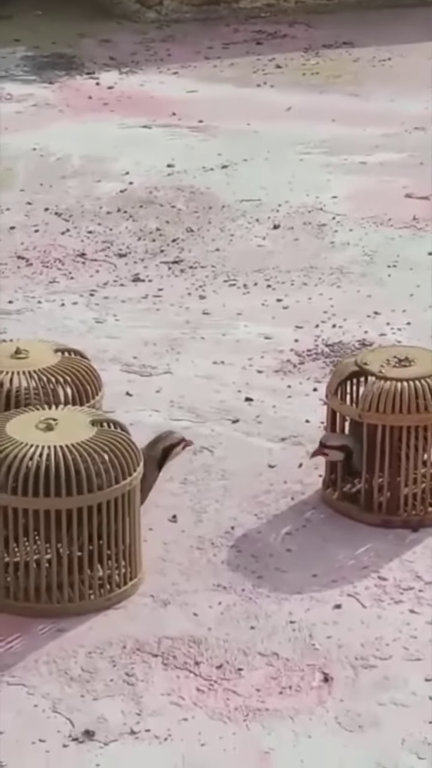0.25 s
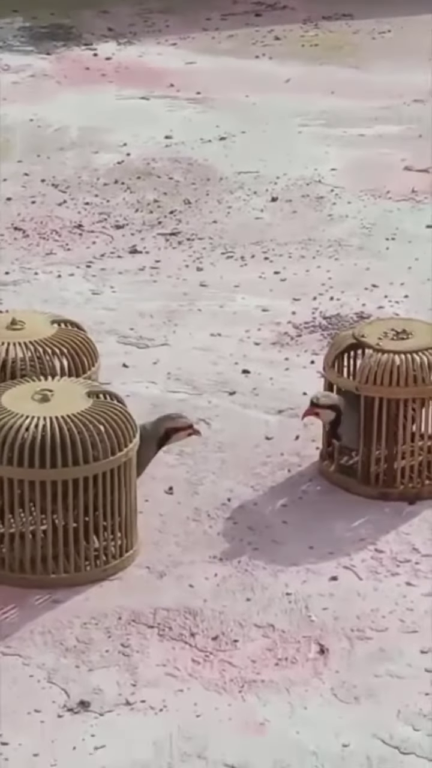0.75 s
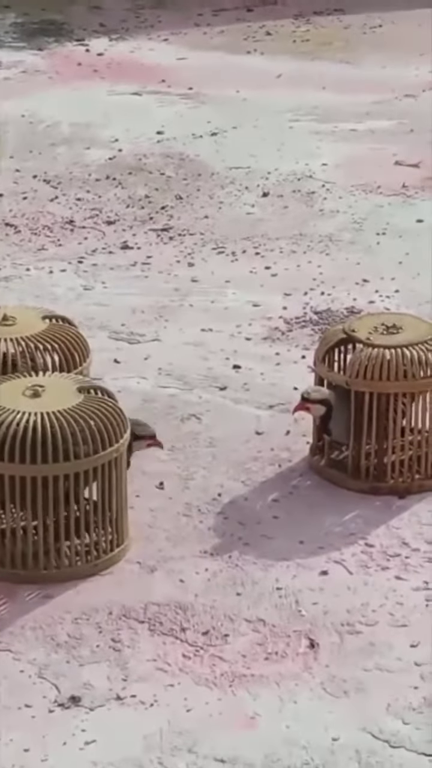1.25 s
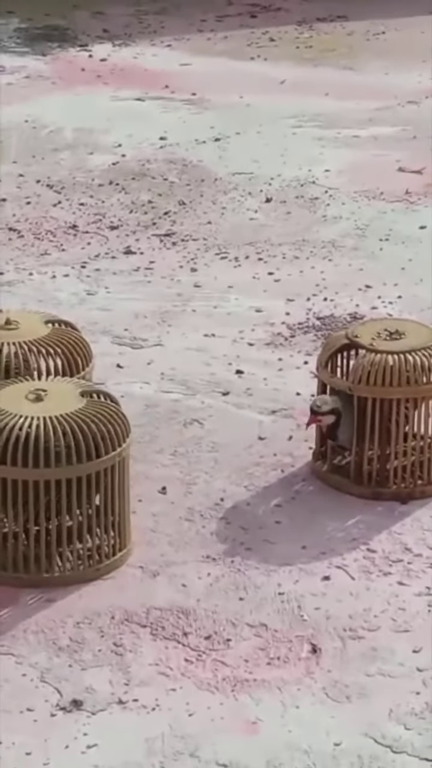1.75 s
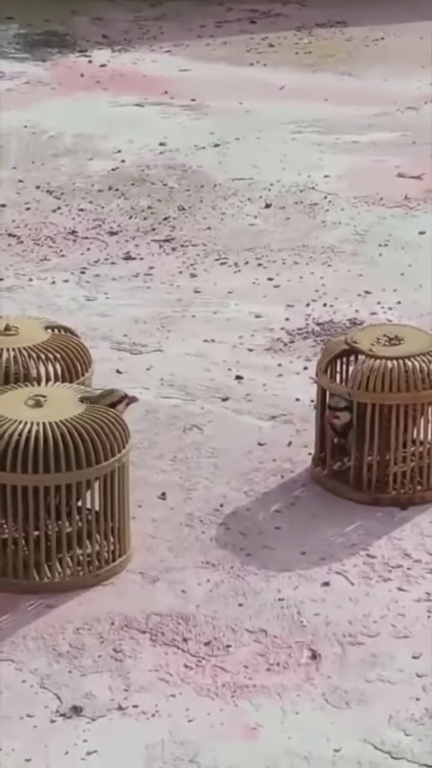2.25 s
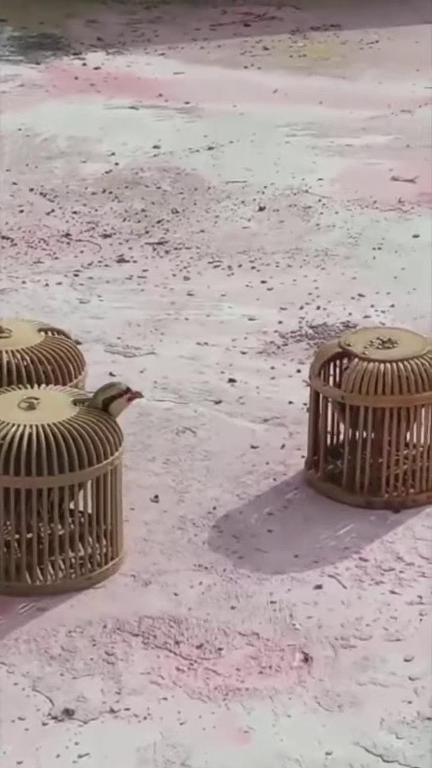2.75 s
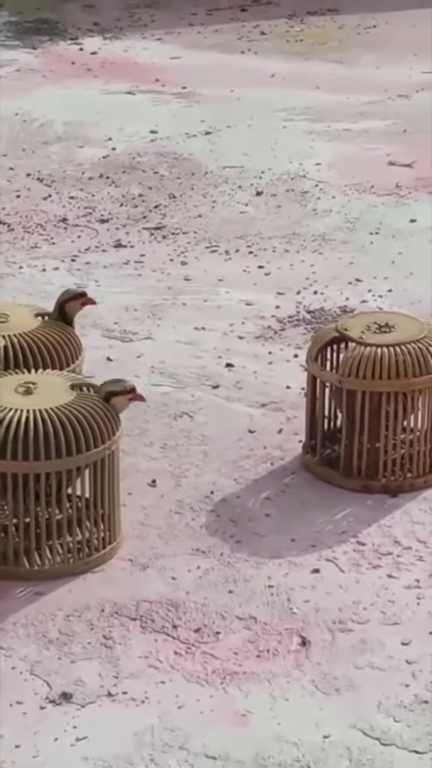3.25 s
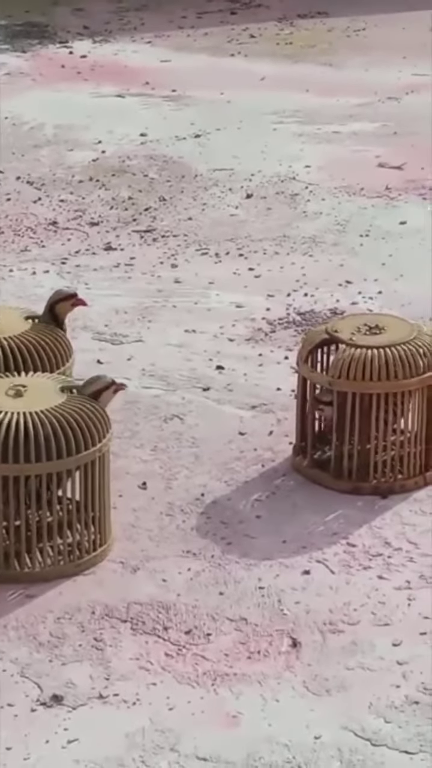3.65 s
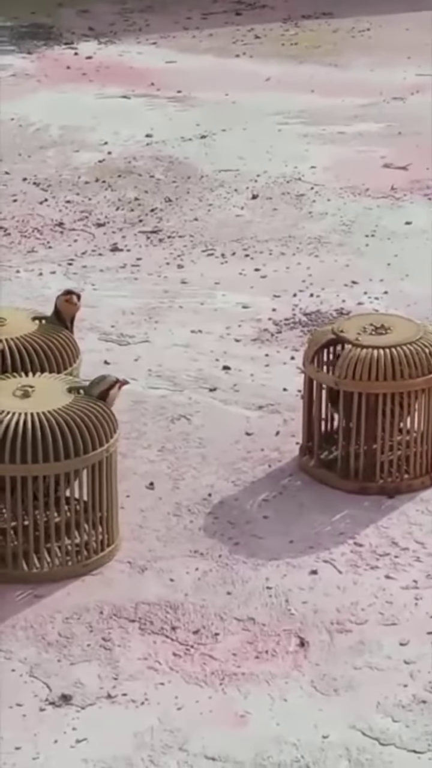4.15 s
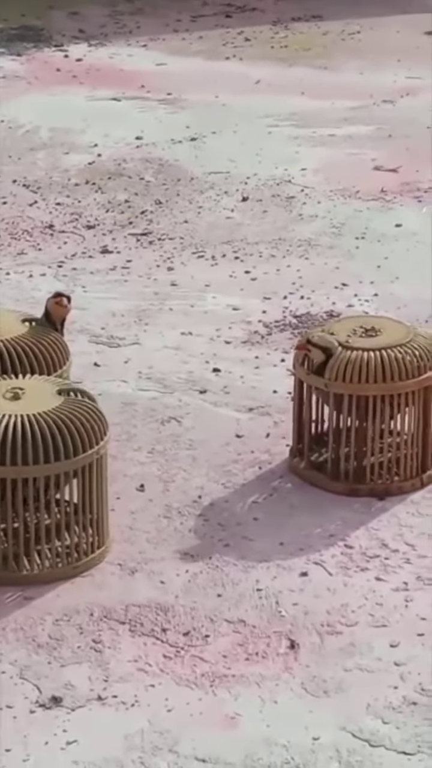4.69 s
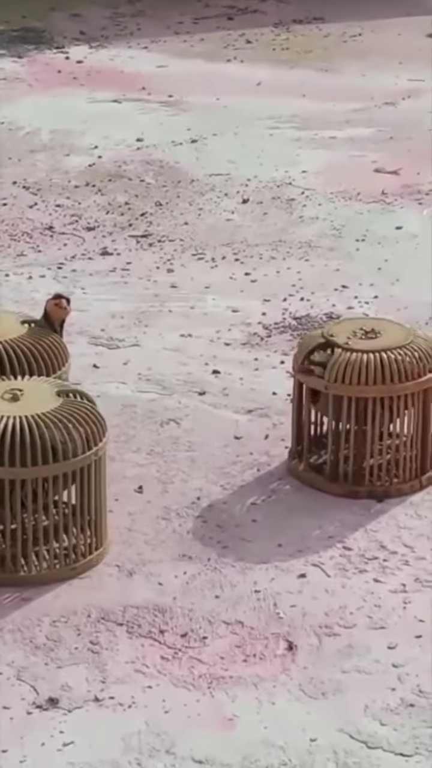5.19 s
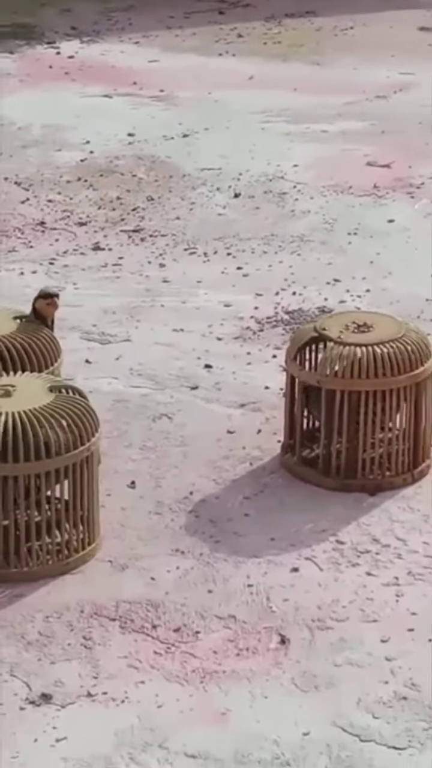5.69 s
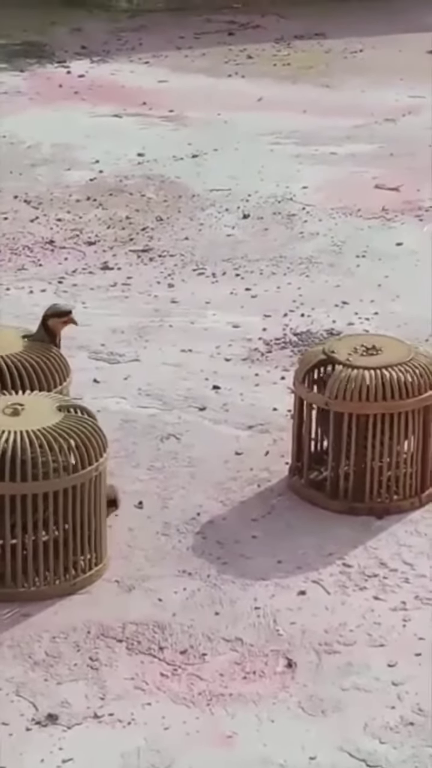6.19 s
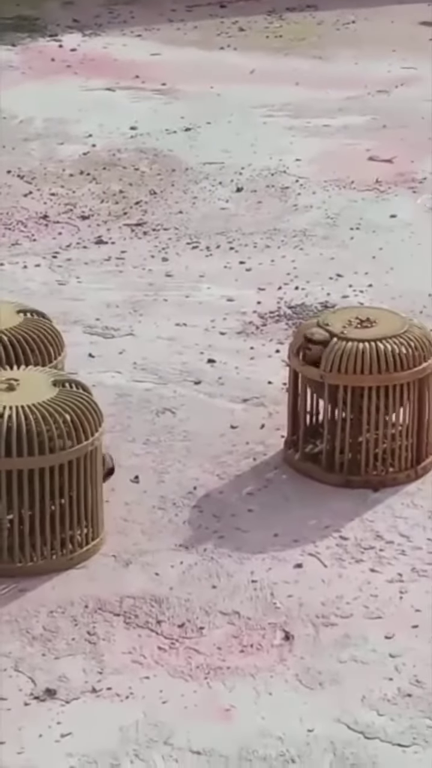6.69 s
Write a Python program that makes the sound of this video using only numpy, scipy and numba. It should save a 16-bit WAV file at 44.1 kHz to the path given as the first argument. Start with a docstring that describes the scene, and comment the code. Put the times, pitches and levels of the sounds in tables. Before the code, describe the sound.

Rasping partridge clucks and squeaky squawks alternate outdoors, echoing briefly off walls, before fading to quieter clucks with light wind bumps.

```python
"""A concrete yard with a wall behind it, where caged partridges call to each other.
Harsh falling clucks alternate with sharper squawks, then thin out into softer answers, with low coos between.
Soft clear tones are faint short notes, and call tails ringing on in the yard.
Each voice is a rough pulse train from the syrinx through throat and beak resonances, with gliding clear tones.
A thin, wavering tone whistles far off; shaped noise makes the background, rumble, rustles and light wind,
and short decaying sines are the wind bumping the microphone."""
import sys
import numpy as np
from scipy import signal
from scipy.fft import rfft, irfft, next_fast_len
from scipy.io import wavfile
from scipy.ndimage import uniform_filter1d
from numba import njit

SR = 44100
rng = np.random.default_rng(int(sys.argv[2]) if len(sys.argv) > 2 else 0)


def materialize(psi):
    """Save the field psi as 16-bit PCM at rate SR to the path in sys.argv[1].

    A 1-D psi becomes a single channel; in a 2-D psi each row is a channel.
    """
    bounded = np.clip(np.atleast_2d(psi).T, -1, 1)
    quanta = np.round(bounded * 32767).astype(np.int16)
    wavfile.write(sys.argv[1], SR, quanta)


N = 305613
TIME = np.arange(N) / SR


def from_db(db):
    """Decibels to gain."""
    return 10 ** (np.asarray(db) / 20)


def rms_one(x):
    """Scale to unit power."""
    return x / np.sqrt(np.mean(x ** 2) + 1e-20)


def in_time(rows):
    """Each column of a curve at every sample."""
    seconds, *columns = np.transpose(rows)
    return [np.interp(TIME, seconds, column) for column in columns]


def at_hz(points, hz):
    """Read a spectrum on a log-frequency axis."""
    f, value = np.transpose(points)
    return np.interp(np.log(hz + 1), np.log(f), value)


def add(out, start_s, sound):
    """Mix a sound in at a time."""
    i = max(0, int(start_s * SR))
    out[..., i:i + sound.shape[-1]] += sound[..., :max(0, N - i)]


def wobble(size, rate_hz):
    """Random wander that takes a new value at the given rate."""
    at = np.arange(size) * rate_hz / SR
    return np.interp(at, np.arange(size), rng.standard_normal(size))


# Left-right likeness of diffuse sound. Each row: frequency in Hz, likeness from 0 to 1.
LIKENESS = [(60, 0.48), (160, 1), (300, 1), (900, 0.9), (1400, 0.85), (2300, 0), (4000, 0), (8000, 0.34)]


def diffuse(spectrum, size):
    """Stereo noise from all around: its two sides are more or less alike at each frequency."""
    hz = np.fft.rfftfreq(size, 1 / SR)
    alike = np.clip(at_hz(LIKENESS, hz), -1, 1)
    mid, side = rfft(rng.standard_normal((2, size)))
    pair = np.sqrt(1 + alike) * mid + np.sqrt(1 - alike) * side * [[1], [-1]]
    return rms_one(irfft(pair * from_db(at_hz(spectrum, hz)), size))


@njit
def resonate(x, hz, width):
    """A moving resonance with about unit gain at its peak."""
    y, r = np.zeros(len(x)), np.exp(-np.pi * width / SR)
    for i in range(2, len(x)):
        driven = (1 - r * r) / 2 * (x[i] - x[i - 2])
        y[i] = driven + 2 * r * np.cos(2 * np.pi * hz[i] / SR) * y[i - 1] - r * r * y[i - 2]
    return y


def resonate_twice(x, hz, width):
    """The same resonance twice in a row, for steeper sides."""
    return resonate(resonate(x, hz, float(width)), hz, float(width))


def syrinx(pitch, jitter, rasp, uneven_db=2.5):
    """Uneven pulses of the membranes, lapsing into strong and weak pairs, each with a puff of turbulence."""
    size = len(pitch)
    phase = 2 * np.pi * np.cumsum(pitch * (1 + jitter * wobble(size, 260.6))) / SR
    harmonic = np.arange(1, 20)[:, None]
    pulses = rms_one(np.cos(harmonic * phase + .16 * harmonic ** 2).sum(0))
    puffs = rms_one(rng.standard_normal(size) * (1 + np.cos(phase)))
    pairs = 1 + .45 * wobble(size, 60) * np.cos(phase / 2)
    return (pulses + rasp * puffs) * pairs * from_db(uneven_db * wobble(size, 298.8))


def rattle(size, depth, rate_hz=125, scatter=.25):
    """Slow, uneven flapping of the syrinx: a gain that breaks the note into grains, and a ramp up each grain."""
    rate = rate_hz * (1 + scatter * wobble(size, rate_hz))
    turn = (rng.random() + np.cumsum(rate) / SR) % 1
    return rms_one(1 - depth * np.cos(2 * np.pi * turn)), turn - .5


def throat(source, beak_hz, beak, chest, chest_db, treble, treble_db):
    """Steep resonances in parallel: the middle ones follow the beak and are evened in level, the rest stay."""
    def bank(modes, scale):
        out = np.zeros(len(source))
        for k, (f, width, db) in enumerate(modes):
            out += (-1) ** k * from_db(db) * resonate_twice(source, f * scale, width)
        return out
    still = np.ones(len(source))
    core = bank(beak, beak_hz)
    power = uniform_filter1d(core ** 2, size=700) + np.var(core) / 10
    fixed = from_db(chest_db) * bank(chest, still) + from_db(treble_db) * bank(treble, still)
    return core / np.sqrt(power) + fixed / np.std(core)


def push(t, length, swell, release, start_db=-16, onset=.004):
    """Air pressure of one note: a quick onset (s), a swell, a hold and a collapse."""
    rise = np.minimum(t / onset, 1) * from_db(start_db * np.maximum(1 - t / swell, 0))
    return rise * np.exp(-np.maximum(t - length, 0) / release)


def glide(length, hz, rise, waver, flutter, octave_db):
    """A short clear tone that swells and fades while it slides through its pitch."""
    u = np.linspace(0, 1, int(length * SR))
    pitch = hz * (1 + rise * (u - .5)) * (1 + waver * wobble(len(u), 294))
    phase = 2 * np.pi * np.cumsum(pitch) / SR
    swell = np.sin(np.pi * u) * (1 + flutter * wobble(len(u), 270))
    return swell * (np.sin(phase) + from_db(octave_db) * np.sin(2 * phase))


def placed(note, pan_db, bounce_db=-9, bounce_s=0.00219):
    """A note on two sides with one short reflection, its delay drawn at random for each note and side."""
    at = np.arange(len(note))
    lags = rng.uniform(.2, 1, 2) * bounce_s * SR
    bounce = np.array([np.interp(at - lag, at, note, left=0) for lag in lags])
    both = note + from_db(bounce_db) * bounce
    return both * from_db([[pan_db], [0]]) / np.sqrt(1 + from_db(bounce_db) ** 2)


# Level of the outdoor background. Each row: time in seconds, level in dB.
BACKGROUND = [(0, -63.5), (.5, -56.5), (1.5, -54.5), (3.5, -52.5), (4.6, -59.5), (5.2, -60.5), (5.9, -57),
              (6.93, -59)]
# Its colour. Each row: frequency in Hz, relative density in dB.
YARD = [(45, -5.5), (200, -15.5), (320, -3), (430, -6), (700, -5), (1300, 0), (2100, -4.5), (3000, -14),
        (4500, -18.5), (6000, -20.5), (7500, -47.5)]


def outdoor_background():
    """Diffuse noise with a fixed colour and a slowly moving level."""
    level_db, = in_time(BACKGROUND)
    return diffuse(YARD, N) * from_db(level_db)


# Level of the low, distant rumble. Each row: time in seconds, level in dB.
RUMBLE = [(0, -67), (.3, -66), (.45, -56.5), (2, -58.5), (3.6, -60.5), (6.93, -67)]
# Its colour. Each row: frequency in Hz, relative density in dB.
RUMBLE_COLOUR = [(40, -21), (85, 0.5), (155, 1), (230, -11.5), (400, -36)]


def rumble():
    """Low diffuse noise that comes up early and slowly fades."""
    level_db, = in_time(RUMBLE)
    return diffuse(RUMBLE_COLOUR, N) * from_db(level_db)


# Strength of the breeze. Each row: time in seconds, level in dB before lumps and side trims.
BREEZE = [(0, -83), (.6, -72), (3.9, -66), (4.3, -56.5), (4.6, -60), (4.85, -53), (5.4, -54.5),
          (5.7, -56.5), (6.3, -61), (6.6, -74.5)]
# Colour of the wind. Each row: frequency in Hz, relative density in dB.
WIND = [(12, -56.5), (20, -26.5), (44, -0.5), (81, 1), (128, -7), (216, -21), (300, -21), (390, -60.5),
        (660, -120)]
# Wind bumps. Each row: start in seconds, relative level in dB, left pitch in Hz, left over right in dB.
BUMPS = [(2.886, -50, 74, 20.5), (2.924, -44.5, 98, 21), (4.107, -49.5, 80, 16), (4.363, -47, 72, 16),
         (4.781, -45.5, 77.4, 13), (5.348, -42.5, 101, 27), (5.377, -37.5, 109, 18.5),
         (5.393, -35, 126, 18), (5.465, -39.5, 91, 17), (5.915, -38, 176, -21.5), (6.109, -49, 79.6, 18)]


def wind(lumps_db=-4.0, left_db=6, right_db=-2, eddy_db=6):
    """Lumpy rumble on the ports, and single eddies that thump for a cycle or two, unlike on each side."""
    wind_db, = in_time(BREEZE)
    lumps = from_db(wind_db + lumps_db * wobble(N, 24))
    out = diffuse(WIND, N) * lumps * from_db([[left_db], [right_db]])
    t = np.arange(SR // 10) / SR
    for s, db, hz, pan_db in BUMPS:
        eddy = np.sin(2 * np.pi * hz * t * [[1], [.85]]) * from_db([[pan_db / 2], [-pan_db / 2]])
        envelope = np.minimum(t / 0.0029, 1) * np.exp(-t * hz / 0.82)
        add(out, s, from_db(db + eddy_db) * eddy * envelope)
    return out


# Soft rustles. Each row: middle in seconds, half length in seconds, level in dB before the grain.
RUSTLES = [(5.685, 0.076, -59.5), (6.006, 0.16, -56), (6.287, 0.11, -60.5)]
# Their colour. Each row: frequency in Hz, relative density in dB.
RUSTLE_COLOUR = [(300, -35), (1500, 6.5), (3500, 0.5), (5500, -5), (7000, -9.5)]


def rustles(grain_db=2.5):
    """Soft, grainy swishes: coloured noise under bell-shaped swells."""
    swell = sum(from_db(db) * np.exp(-((TIME - s) / half) ** 2) for s, half, db in RUSTLES)
    return diffuse(RUSTLE_COLOUR, N) * swell * from_db(grain_db * wobble(N, 90))


# Far whistle. Each row: time in seconds, pitch in Hz before waver, relative level in dB,
# octave in dB against the fundamental.
WHISTLE = [(4.98, 2300, -76, -20), (5.08, 2330, -59, -22), (5.27, 2346, -64, -18), (5.37, 2620, -55.5, -6),
           (5.47, 2543, -55, -12), (5.56, 2503, -57, -3), (5.66, 2485, -57, -11.5), (5.78, 2525, -58, -13),
           (5.86, 2480, -64, -22), (5.96, 2383, -54, -23), (6.15, 2420, -80, -20)]


def whistle(waver=.024):
    """A nearly pure, wavering note whose octave comes and goes and whose level flutters."""
    hz, db, octave_db = in_time(WHISTLE)
    phase = 2 * np.pi * np.cumsum(hz * (1 + waver * wobble(N, 1100))) / SR
    sounding = (TIME > WHISTLE[0][0]) & (TIME < WHISTLE[-1][0])
    note = np.sin(phase) + from_db(octave_db) * np.sin(2 * phase)
    return sounding * from_db(db) * note * from_db(4 * wobble(N, 45) - 4)


# Soft clear tones: faint short notes, and call tails ringing on in the yard.
# Each row: start in seconds, length in seconds, middle pitch in Hz, slide as a share, level in dB.
CLEAR_TONES = [(.245, 0.061, 1238, -.033, -48), (.982, 0.027, 1235, .076, -42),
               (1.785, 0.059, 1506, 0, -45), (2.43, .04, 1190, 0, -43.5), (3.484, 0.052, 1299, -.062, -37),
               (5.402, .028, 1305, -.064, -45), (5.645, 0.06, 1184, .054, -49.5),
               (5.86, 0.047, 1225, .34, -47), (6.148, 0.019, 1157, .28, -44),
               (6.481, .03, 814, .085, -54.5)]


def clear_tones(waver=.045):
    """Soft sliding tones with a faint octave, blurred by fast random wander of pitch and level."""
    out = np.zeros(N)
    for s, length, hz, rise, db in CLEAR_TONES:
        add(out, s, from_db(db) * glide(length, hz, rise, waver, flutter=.45, octave_db=-19))
    return out


# Low coos. Each row: start in seconds, length in seconds, relative level in dB, throat resonance in Hz,
# slide as a share, clear partial in dB, beak resonance in Hz, its level in dB, treble in dB.
COOS = [(0.559, .045, -45, 850, -.2, -9, 2220, -4.5, -12),
        (0.674, .05, -46.5, 880, 0.17, -13, 2160, -4, -10),
        (1.059, 0.045, -45.5, 856, -0.0051, 13, 2180, -4.5, -11),
        (1.561, 0.043, -48, 777, 0.0058, 5.5, 2170, -9.5, -11.5),
        (1.68, .04, -44.5, 852, -0.12, -10.5, 2060, -4, -8),
        (2.128, 0.036, -47, 776, -.07, 3.5, 2070, 6, -8.5),
        (2.235, 0.05, -50.5, 849, .16, 2.5, 2190, -4.5, -6),
        (2.557, 0.067, -48.5, 949, -0.12, -3, 2160, -0.5, -13.5),
        (3.613, .035, -50, 834, -0.081, -9, 1880, 2, -13),
        (3.678, 0.056, -52, 738, .15, -10, 2070, 6.5, 4.5)]


def coos(throat_width_hz=350, beak_width_hz=450, treble_hz=4300, treble_width_hz=2200, hum_db=-9,
         release=0.018, swell=0.01, linger=1.25):
    """Low notes with the beak nearly shut: one partial glides in the throat resonance under a thin rasp."""
    out, t = np.zeros((2, N)), np.arange(SR // 7) / SR
    for s, length, db, throat_hz, slide, clear_db, beak_hz, beak_db, treble_db in COOS:
        bend = 1 + slide * (np.minimum(t / length, 1.4) - .5)
        source = syrinx(throat_hz / 2 * bend, jitter=.11, rasp=.7)
        modes = [(throat_hz, throat_width_hz, 0), (throat_hz * 0.68, throat_width_hz, hum_db),
                 (beak_hz, beak_width_hz, beak_db), (treble_hz, treble_width_hz, treble_db)]
        voice = np.zeros(len(t))
        for hz, width, mode_db in modes:
            voice += from_db(mode_db) * rms_one(resonate_twice(source, hz * bend, width))
        add(out, s, placed(voice * push(t, length, swell, release) * from_db(db), pan_db=-0.5))
        clear = glide(length * linger, throat_hz, slide, waver=.022, flutter=.3, octave_db=-20)
        add(out, s, placed(clear * from_db(db + clear_db), pan_db=0.5))
    return out


# Beak resonances of clucks and answers. Each row: multiple of the beak resonance, width in Hz, level in dB.
CLUCK_BEAK = [(0.815, 372, 3), (1.022, 349, 1.5), (1.298, 513, 1.5)]
# Fixed windpipe resonances of clucks and answers, low then high. Each row: Hz, width in Hz, relative level in dB.
CLUCK_CHEST = [(410, 280, -18), (800, 400, -11)]
CLUCK_TREBLE = [(3437, 1200, -19.5), (4460, 160, -24), (5560, 760, -24.5)]
# Soft answers. Each row: start in seconds, length in seconds, relative level in dB,
# middle beak resonance in Hz, treble in dB, clear partial in dB against the note.
ANSWERS = [(3.371, 0.017, -43.5, 1758, 10.5, -1), (3.495, 0.038, -42, 1750, 16, -1),
           (3.606, 0.031, -39, 1665, 1, 5.5), (3.979, 0.034, -46.5, 1664, 10, 11.5),
           (4.258, .089, -45.5, 1560, 7, -0.5), (4.439, 0.066, -44, 1543, 1, 2),
           (4.497, .039, -42.5, 1510, 10, -3), (4.694, .053, -46.5, 1592, 0, 5.5),
           (4.969, .033, -51, 1420, -18, 3.5), (5.152, .058, -46, 1586, -23, -1.5),
           (5.343, .055, -47, 1610, -2, 7), (5.577, .048, -47.5, 1615, -19, 4.5),
           (5.644, .04, -49, 1615, 9, -2.5), (5.76, .045, -47, 1584, -4, 7), (6.07, .075, -45, 1773, 6, 0),
           (6.253, .05, -45.5, 1630, -14, 7), (6.55, .038, -44.5, 1565, -20, 0.5),
           (6.727, .043, -45, 1528, 6.5, 5.5), (6.843, .039, -48, 1586, -11, -1.5)]


def answers(pitch_hz=400, pitch_rise=0.1062, beak_rise=0.11, chest_db=-1.0, top_hz=3700, top_db=-18,
            gain_db=-1, clear_ratio=0.99, clear_rise=-.1, clear_delay_s=0.00305, clear_s=.026,
            pan_db=0.5, swell=.01, release=0.02, wander=0.091):
    """The same voice held softly: it opens on one clear partial, then turns to a rasp that lifts at the end."""
    out, t = np.zeros((2, N)), np.arange(SR // 7) / SR
    treble = CLUCK_TREBLE + [(top_hz, 450, top_db)]
    for s, length, db, beak_hz, treble_db, clear_db in ANSWERS:
        spent = np.minimum(t / length, 1.6) - .5
        pitch = pitch_hz * (1 + 0.077 * rng.standard_normal()) * (1 + pitch_rise * spent)
        source = syrinx(pitch, jitter=.045, rasp=.18)
        grains, _ = rattle(len(t), depth=.5)
        beak = beak_hz * (1 + beak_rise * spent + wander * wobble(len(t), 106.0))
        voice = grains * throat(source, beak, CLUCK_BEAK, CLUCK_CHEST, chest_db, treble, treble_db)
        pressure = push(t, length, swell, release)
        add(out, s, placed(voice * pressure * from_db(db + gain_db), pan_db))
        clear = glide(clear_s, beak_hz * clear_ratio, clear_rise, waver=0.039, flutter=0.51, octave_db=-35.0)
        add(out, s + clear_delay_s, placed(clear * from_db(db + clear_db), pan_db))
    return out


# Squeals in the squawks. Each row: start in seconds, length in seconds, middle pitch in Hz,
# slide as a share, relative level in dB.
SQUEALS = [(.364, .026, 2250, .1, -39), (0.733, 0.03, 3400, 0.23, -32), (.757, .016, 1884, .1, -29.5),
           (.777, 0.023, 2830, -0.073, -34.5), (1.144, .036, 2260, -0.017, -26),
           (1.155, .017, 3060, 0.032, -29), (1.549, .025, 2214, .06, -24.5),
           (1.574, .014, 2535, -.1, -27.5), (2.352, .022, 2340, 0.075, -26.5),
           (2.703, 0.019, 2266, .1, -25), (2.726, 0.017, 1930, .2, -19), (2.734, .017, 2640, 0.1, -23),
           (4.046, 0.011, 1645, 0.23, -31.5), (4.324, 0.032, 2246, 0.067, -23.5),
           (4.345, .013, 1830, 0.22, -22), (4.852, 0.021, 2200, 0.022, -30),
           (6.615, 0.029, 2150, -0.0056, -32.5)]


def squeals(waver=.02):
    """The syrinx briefly locks into a clear, sliding tone."""
    out = np.zeros((2, N))
    for s, length, hz, rise, db in SQUEALS:
        squeal = glide(length, hz, rise, waver, flutter=0.36, octave_db=-27.5)
        add(out, s, placed(from_db(db) * squeal, pan_db=-1.5))
    return out


# Beak resonances of the squawks. Each row: multiple of the beak resonance, width in Hz, level in dB.
SQUAWK_BEAK = [(.74, 500, -5.5), (1.03, 534, 4.5), (1.3, 479, -5)]
# Their fixed windpipe resonances, low then high. Each row: Hz, width in Hz, relative level in dB.
SQUAWK_CHEST = [(434, 520, -14), (923, 330, -7)]
SQUAWK_TREBLE = [(3205, 470, -3.5), (4100, 1400, -13), (5770, 1830, -16.5)]
# Squawks. Each row: start in seconds, nominal length in seconds, relative level in dB, middle pitch in Hz,
# pitch rise as a share, relative roughness, middle beak resonance in Hz, chest in dB, treble in dB.
SQUAWKS = [(.352, .07, -36, 725.4, -.046, .9, 2135, -5, 5.5),
           (0.719, .062, -28, 725, 0.2, 1, 2013, -1.5, -0.5),
           (1.132, .07, -29.5, 757.4, -0.038, .9, 2150, 0, 0),
           (1.54, 0.063, -27, 751, -0.13, .9, 2246, -3.5, 1.5),
           (1.96, .055, -33, 641, 0.06, 1.1, 1720, 2, 4.5),
           (2.332, .06, -27.5, 800, .046, .9, 2170, -3.5, 1.5),
           (2.697, .055, -28.5, 664, 0.47, .5, 2070, -9, 1.5),
           (3.102, .065, -35.5, 669, -0.016, 1, 1800, 0, 5.5),
           (4.024, 0.055, -33.5, 589.6, 0.18, 0.9, 1710, -8, 0.5),
           (4.207, 0.017, -40, 733, 0.11, .4, 2140, -2, -9.5),
           (4.317, .05, -27.5, 742, .05, 0.6, 2010, -7, -1.5),
           (4.817, .082, -34.5, 743.7, 0.06, 0.9, 1890, -4, -3),
           (5.31, .0144, -42.5, 727, 0.14, .5, 1960, -13, -9.5),
           (5.982, .085, -39.5, 775, -0.0012, .5, 1716, 1, -0.5),
           (6.362, .058, -41, 769.6, -0.16, 0.7, 1910, 0.5, -9),
           (6.601, .06, -36.5, 733, -0.0072, .55, 1990, -2, -7)]


def squawks(arch=0.1627, top_hz=3900, top_db=-15, gain_db=-1.5, pan_db=-2, release=0.021, wander=0.12,
            rattle_sweep=.2, swell_share=.4):
    """Higher, rasping notes that swell while the pitch arches and the beak resonance quivers."""
    out, t = np.zeros((2, N)), np.arange(SR // 8) / SR
    treble = SQUAWK_TREBLE + [(top_hz, 500, top_db)]
    for s, length, db, pitch_hz, rise, rough, beak_hz, chest_db, treble_db in SQUAWKS:
        spent = np.minimum(t / length, 1.2) - .5
        bend = 1 + rise * spent - arch * spent ** 2
        grains, ramp = rattle(len(t), depth=.5)
        pitch = pitch_hz * bend * (1 + rattle_sweep * ramp)
        source = syrinx(pitch, jitter=.11 * rough, rasp=.45 * rough)
        beak = beak_hz * np.sqrt(bend) * (1 + rattle_sweep * ramp + wander * wobble(len(t), 115))
        voice = grains * throat(source, beak, SQUAWK_BEAK, SQUAWK_CHEST, chest_db, treble, treble_db)
        pressure = push(t, length * 0.77, length * swell_share, release, start_db=-7.5)
        add(out, s, placed(voice * pressure * from_db(db + gain_db), pan_db))
    return out


# Harsh clucks, also read for their chest hums. Each row: start in seconds, length in seconds,
# relative level in dB, middle beak resonance in Hz, top resonance in Hz, treble in dB,
# clear partial in Hz, its slide as a share, its relative level in dB against the note,
# chest in dB at mid-note, relative level of the closing hum in dB.
CLUCKS = [(0.039, 0.054, -51, 1820, 4280, 11, 1370, -.034, -1.5, 10.5, -66),
          (0.188, .057, -51.5, 1425, 2930, 15.5, 1225, -0.0049, 2, 12, -66.5),
          (.419, 0.043, -38.5, 1470, 4260, 8.5, 1241, -.2, -3, 3.5, -57),
          (0.738, 0.055, -35.5, 1550, 2980, 17.5, 1745, 0.15, -0.5, -5.5, -52.5),
          (0.912, 0.035, -35, 1436, 4340, 10.5, 1400, -0.26, 6, 2.5, -55.5),
          (1.197, .058, -32, 1536, 3120, 19, 1350, -0.074, -6.5, 7, -47),
          (1.412, 0.047, -27, 1844, 4340, 6.5, 1900, -.2, -1, -2, -48.5),
          (1.572, 0.043, -35.5, 1760, 3050, 18, 1160, -.15, -4, 6, -57.5),
          (1.721, .056, -32, 1420, 5250, 8.5, 1460, .1, 7, 0, -52.5),
          (1.928, .047, -28, 1750, 5460, 8, 1735, -.1, 0, -2, -50.5),
          (2.245, 0.077, -34, 1600, 4400, 6, 1312, -0.29, -4.5, 4, -53),
          (2.502, 0.035, -34.5, 1530, 4340, 6.5, 1239, -0.22, -0.5, 0, -46),
          (2.641, .046, -32, 1620, 3660, 16, 1306, -.29, 6.5, 5, -50),
          (2.827, .05, -41.5, 2050, 3510, -2, 1800, -.2, 7, -0.5, -78.5),
          (2.885, .025, -30.5, 1577, 4100, 3, 1370, -0.28, 0.5, 2, -49.5),
          (3.01, .07, -30, 1564, 3765, 14, 1458, 0.074, -2.5, -0.5, -49),
          (3.267, .032, -33.5, 1625, 5620, 4.5, 1309, -.1, 0, -2.5, -50),
          (3.394, 0.042, -31, 1627, 4960, 10, 1708, -0.11, 2, 2, -50),
          (3.748, .036, -30, 1724, 4890, 7, 1470, -.1, -5, -0.5, -52)]


def chest_hums(from_share=.5, length_s=.0518, pitch_hz=353, rise=-.43, octave_db=-10, gain_db=1.5):
    """The clean, sinking fundamental of each cluck, from mid-note on, left sounding as the rasp dies."""
    out = np.zeros(N)
    for s, length, *_, hum_db in CLUCKS:
        hz = pitch_hz * (1 + 0.045 * rng.standard_normal())
        hum = glide(length_s, hz, rise, waver=.02, flutter=0.49, octave_db=octave_db)
        add(out, s + from_share * length, hum * from_db(hum_db + gain_db))
    return out


def clucks(pitch_hz=440, pitch_fall=0.36, beak_fall=0.16, fade_db=6, closing_db=7, top_db=-15,
           pan_db=-1, release=0.017, wander=0.079, clear_s=.034, clear_gain_db=-1,
           push_s=.034, min_swell_s=.0092):
    """As pressure is spent the pitch sinks, the beak closes and the chest takes over; a clear partial rings."""
    out, t = np.zeros((2, N)), np.arange(SR // 7) / SR
    for s, length, db, beak_hz, top_hz, treble_db, clear_hz, slide, clear_db, chest_db, _ in CLUCKS:
        spent = np.minimum(t / length, 1.6) - .5
        # the full push lasts only so long, and a longer note swells up to it
        swell = max(length - push_s, min_swell_s)
        grains, _ = rattle(len(t), depth=.3)
        pitch = pitch_hz * (1 + .07 * rng.standard_normal()) * (1 - pitch_fall * spent)
        source = syrinx(pitch, jitter=.06, rasp=.15)
        beak = beak_hz * (1 - beak_fall * spent + wander * wobble(len(t), 94.0))
        chest_now_db = chest_db + closing_db * spent
        treble = CLUCK_TREBLE + [(top_hz, 680, top_db)]
        voice = grains * throat(source, beak, CLUCK_BEAK, CLUCK_CHEST, chest_now_db, treble, treble_db)
        pressure = push(t, length, swell, release)
        add(out, s, placed(voice * pressure * from_db(db - fade_db * spent), pan_db))
        clear = glide(clear_s, clear_hz, slide, waver=.035, flutter=.4, octave_db=-28)
        clear_start_s = s + max(length - clear_s, 0)
        add(out, clear_start_s, placed(clear * from_db(db + clear_db + clear_gain_db), pan_db))
    return out


# Returns from far walls. Each row: delay in seconds, level in dB.
WALL_RETURNS = [(.074, -13.5), (.118, -23.5)]


def wall_echo(x, hz=1280., width_hz=570.):
    """Late, hollow echoes: far walls throw back the middle of the voice."""
    out = np.zeros(N)
    hollow = resonate(x.mean(0), np.full(N, hz), width_hz)
    for delay_s, db in WALL_RETURNS:
        add(out, delay_s, from_db(db) * hollow)
    return out


# Echoes of ground, cages and wall. Each row: left delay in seconds, right delay in seconds, level in dB.
ECHOES = [(.0019, .00195, -25), (0.011, 0.016, -11.5), (0.027, .0293, -23.5), (.052, 0.014, -18)]


def yard(x, near_db=-4, near_t60=0.24, far_db=-9, far_t60=.85):
    """A few echoes, quick scatter from the walls and a longer tail; T60 is the time to fall 60 dB, in s."""
    t = np.arange(SR) / SR
    response = np.zeros((2, SR))
    # colours: (Hz, relative dB)
    near_colour = [(400, 6.0), (2000, 1.0), (5000, -3.5), (9000, -34.5)]
    far_colour = [(400, -9.0), (1400, -5.5), (2300, -11.5), (4000, -8.0), (9000, -4.0)]
    for db, t60, colour in ((near_db, near_t60, near_colour), (far_db, far_t60, far_colour)):
        tail = diffuse(colour, SR) * from_db(-60 * t / t60) * np.minimum(t / 0.0022, 1)
        response += from_db(db) * rms_one(tail) / np.sqrt(SR * 4)
    for left_s, right_s, db in ECHOES:
        response[[0, 1], [int(left_s * SR), int(right_s * SR)]] += from_db(db)
    return x + signal.fftconvolve(x, response, axes=1)[:, :N]


def scene():
    """Birds and whistle in the yard, over the outdoor background, a low rumble, a few rustles and the wind."""
    calls = clucks() + chest_hums() + answers() + squawks() + squeals() + whistle()
    outdoors = outdoor_background() + rumble()
    soft = yard(clear_tones() + coos(), near_db=-5.5, far_db=-16.5)
    loud = from_db(-0.5) * yard(calls + wall_echo(calls))
    return loud + soft + outdoors + rustles() + wind()


# Colour of each microphone port. Each row: frequency in Hz, gain in dB.
LEFT_PORT = [(900, 1), (1350, 1), (1700, -7.5), (2150, -12), (2600, -5.5), (3100, -1), (4400, 4), (5200, 1),
             (6200, -4.5), (7000, -5)]
RIGHT_PORT = [(900, 0.5), (2300, 4), (3000, -1), (4400, 1.5), (5000, -6), (5700, -16), (6400, -27)]
# Phase between the ports. Each row: frequency in Hz, lead of the left in radians.
PORT_PHASE = [(300, -1), (1100, -0.23), (1650, 1.5), (2100, 0.5), (2450, 1.5), (2900, 9), (3400, 0.5),
              (3900, 8.5), (4600, 8), (6500, 7.5)]
# Colour of the hiss. Each row: frequency in Hz, relative density in dB.
HISS = [(100, 3.5), (3000, -5), (12000, -3), (13500, -24.5)]


def record(dry, hiss_db=-84, call_hiss_db=-50):
    """Each port colours the sound in its own way; its treble ends near 7 kHz, and hiss grows with the level."""
    size = next_fast_len(N + SR // 10)
    hz = np.fft.rfftfreq(size, 1 / SR)
    left = from_db(at_hz(LEFT_PORT, hz)) * np.exp(1j * at_hz(PORT_PHASE, hz))
    right = from_db(at_hz(RIGHT_PORT, hz))
    heard = irfft(rfft(dry, size) * np.array([left, right]), size)[:, :N]
    heard = signal.sosfilt(signal.ellip(6, .5, 38, 6700, fs=SR, output="sos"), heard)
    level = uniform_filter1d(np.abs(heard).mean(0), size=900)
    hiss = (from_db(hiss_db) + from_db(call_hiss_db) * level) * diffuse(HISS, N)
    # a steep low-pass ends the hiss as well
    top = signal.cheby2(12, 60, 13200 * 1.08, fs=SR, output="sos")
    return signal.sosfilt(top, heard + hiss)


dry = scene()
out = record(dry)
materialize(out)
```